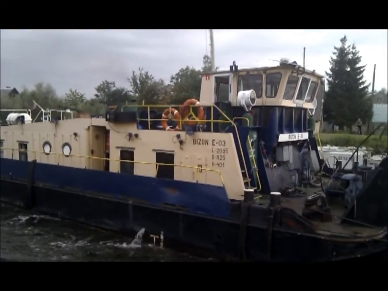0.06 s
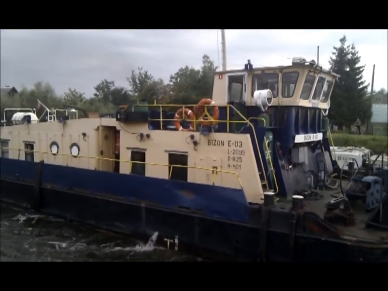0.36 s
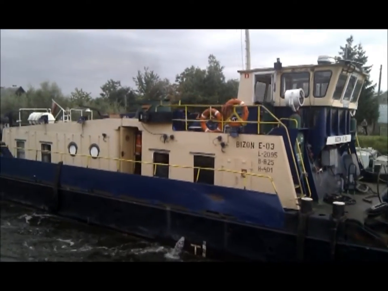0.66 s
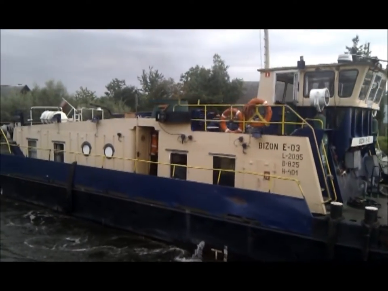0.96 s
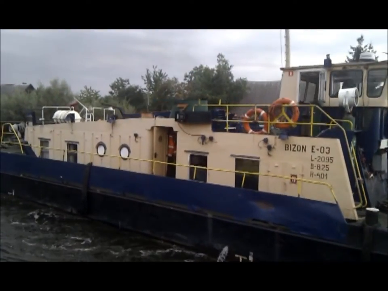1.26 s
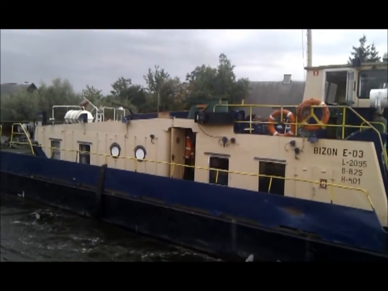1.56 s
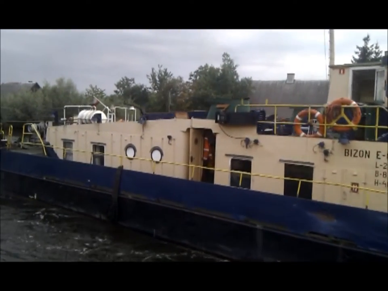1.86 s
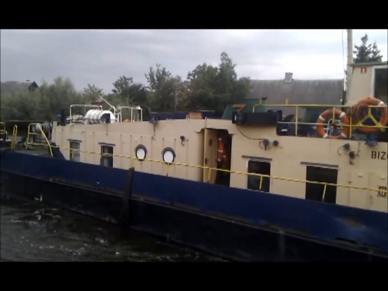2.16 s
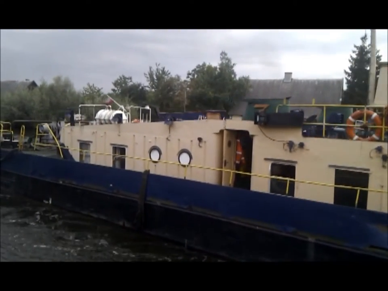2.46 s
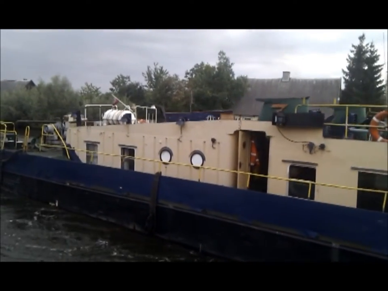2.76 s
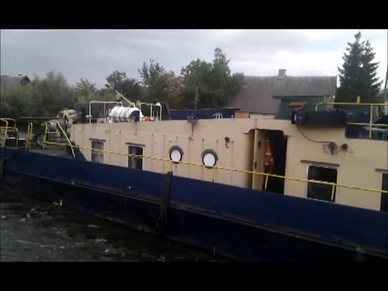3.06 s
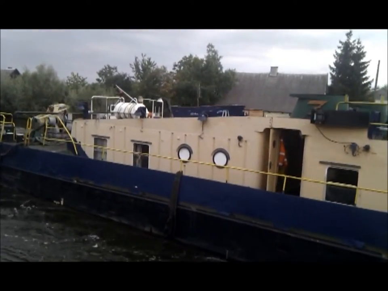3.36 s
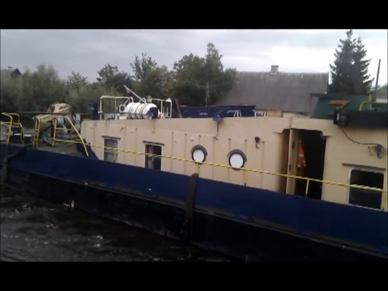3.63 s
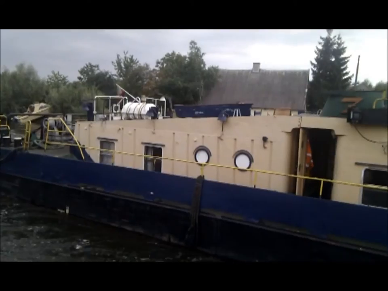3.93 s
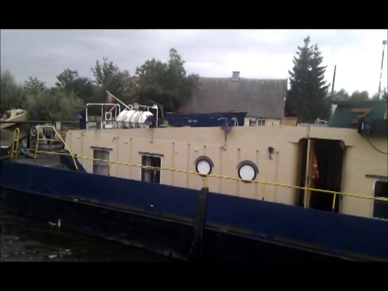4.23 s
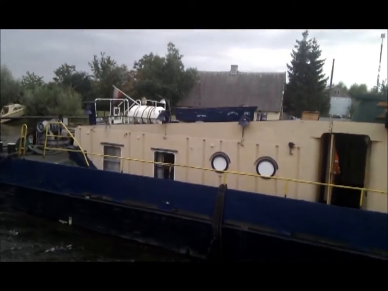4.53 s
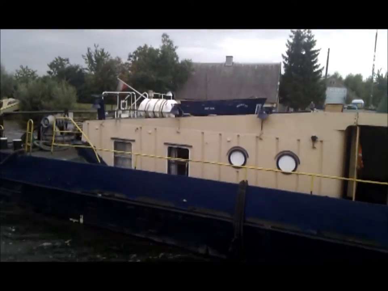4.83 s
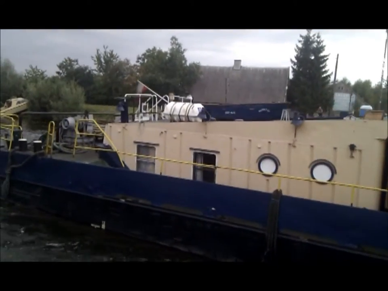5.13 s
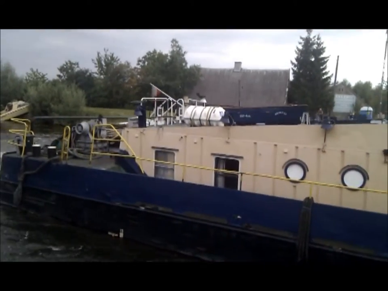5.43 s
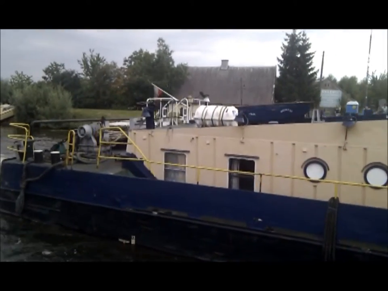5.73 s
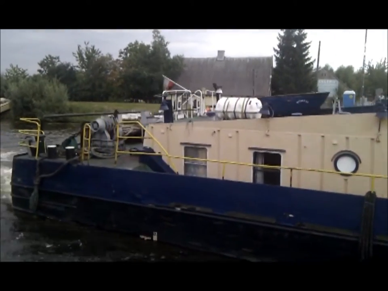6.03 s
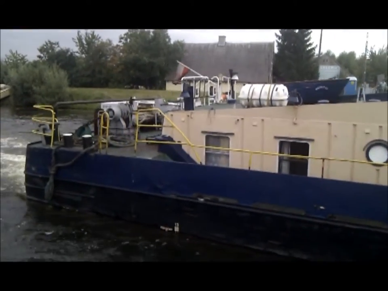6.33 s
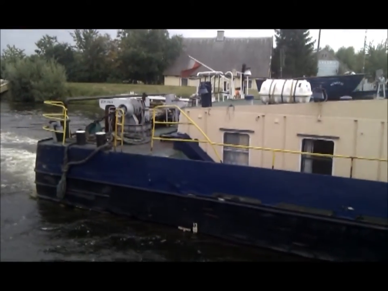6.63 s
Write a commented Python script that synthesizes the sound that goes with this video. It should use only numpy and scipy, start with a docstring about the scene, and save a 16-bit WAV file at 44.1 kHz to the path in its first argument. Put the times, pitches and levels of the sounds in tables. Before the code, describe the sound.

Close diesel engines throb steadily as a tugboat slides past, its machinery rattling and whining over the fizz of churned water.

```python
"""On a river, one small microphone, close to a pusher tug sliding past from wheelhouse to stern.
From the start two six-cylinder diesels beat, a little apart in speed; the deckhouse drones, the engine
room clatters through its open door, gears whine, a generator hums and foam hisses. Short ticks of hiss
come from 0.5 s, dull accents in the clatter from 1.1 s, hard firings thump from 2.4 s. Near 4.4 s the
exhaust comes abeam and the fuller propeller wash takes over; the drone swells last, at 6.5 s."""
import sys
import numpy as np
from scipy import signal
from scipy.fft import rfft, irfft, next_fast_len
from scipy.io import wavfile

SR = 44100
rng = np.random.default_rng(int(sys.argv[2]) if len(sys.argv) > 2 else 0)


def generate_wav(signal):
    """Clip the signal to [-1, 1] and save it as 16-bit WAV at the path in sys.argv[1]."""
    frames = np.transpose(np.atleast_2d(signal))
    scaled = np.clip(frames, -1, 1) * 32767
    pcm = np.round(scaled).astype(np.int16)
    wavfile.write(sys.argv[1], SR, pcm)


N = 295029
T = np.arange(N) / SR
NEAR_CYCLE_HZ, FAR_CYCLE_HZ = 9.209, 9.498  # four-stroke cycle rates of the two engines
# fizzy water along the bow: (frequency [Hz], relative level [dB])
BOW_WATER = [(600, -16.5), (2350, -14.5), (2800, 1), (3050, -4), (3650, 2.5), (4100, 2.5), (4400, -0.5),
             (4900, 0), (5650, -3), (5900, -10), (6400, -10.5), (7100, -35.5)]


def from_db(db):
    """Decibels to gain."""
    return 10 ** (np.asarray(db) / 20)


def rms_one(x):
    """Scale to unit power."""
    return x / np.sqrt(np.mean(x ** 2) + 1e-20)


def drift(rate):
    """A smooth random wander of unit power that turns about rate times a second."""
    step, settle = 40, 2000
    pole = np.exp(-2 * np.pi * rate * step / SR)
    noise = rng.standard_normal(N // step + settle + 2)
    slow = signal.lfilter([1], [1, -2 * pole, pole * pole], noise)[settle:]
    return np.interp(np.arange(N) / step, np.arange(len(slow)), rms_one(slow))


def coloured(x, spectrum):
    """Shape a sound by rows of (frequency [Hz], relative level [dB]); unit power."""
    size = next_fast_len(N)
    hz, db = np.transpose(spectrum)
    bins = np.maximum(np.fft.rfftfreq(size, 1 / SR), 1)
    gain = from_db(np.interp(np.log(bins), np.log(hz), db, left=-90, right=-90))
    return rms_one(irfft(rfft(x, size) * gain, size)[:N])


def resonance(hz, width_hz):
    """Noise ringing in one band with steep skirts; unit power."""
    b, a = signal.iirpeak(hz, hz / (1.23 * width_hz), fs=SR)
    return rms_one(signal.lfilter(b, a, signal.lfilter(b, a, rng.standard_normal(N))))


def swell(at_s, half_s, lift_db, base_db=0):
    """A bell-shaped rise and fall in dB, as when a source slides past the microphone."""
    return base_db + lift_db * np.exp(-((T - at_s) / half_s) ** 2)


def bursts(events, attack_s, decay_s):
    """Envelope of (time [s], level [dB]) events that rise quickly and die away."""
    envelope = np.zeros(N)
    for at_s, db in events:
        age = np.maximum(T - at_s, 0)
        envelope += from_db(db) * (1 - np.exp(-age / attack_s)) * np.exp(-np.minimum(age / decay_s, 20))
    return envelope


def crank(cycle_hz, strongest_s):
    """Engine cycles counted from a firing of the strongest cylinder; the pitch sinks with the pass."""
    doppler = 1 - .001 * (T - 3.7)  # the engines are abeam at 3.7 s
    governor_hunt = 1 + .0001 * drift(.98)
    cycles = np.cumsum(cycle_hz * doppler * governor_hunt) / SR
    return cycles - np.interp(strongest_s, T, cycles)


def firings(cycles, decay, uneven_db, chug_db):
    """A dying pulse for each firing; the six cylinders differ, and the strongest chugs once a cycle."""
    cylinder_db = uneven_db * rms_one(rng.standard_normal(6))
    cylinder_db += chug_db * np.cos(2 * np.pi * np.arange(6) / 6)
    stroke = cycles * 6 + decay / 2
    cylinder = np.floor(stroke).astype(int) % 6
    return rms_one(from_db(cylinder_db)[cylinder] * np.exp(-(stroke % 1) / decay))


def pulsed_noise(engines, depth, decay, uneven_db, chug_db, repeat, slip_s=.00013):
    """Noise pulsing with both engines' firings; valves and gears repeat a share of it every cycle."""
    near, far = (firings(cycles, decay, uneven_db, chug_db) for cycles in engines)
    power = (2 * near ** 2 + far ** 2) / 3
    angle = np.linspace(0, 1, round(SR / FAR_CYCLE_HZ / 2))
    rattle = np.zeros(N)
    for cycles in engines:
        position = (cycles + slip_s * NEAR_CYCLE_HZ * drift(2.8)) % 1
        rattle += np.interp(position, angle, rng.standard_normal(len(angle)))
    fresh = np.interp(np.arange(N) / 2, np.arange(N), rng.standard_normal(N))
    noise = np.sqrt(1 - repeat) * rms_one(fresh) + np.sqrt(repeat) * rms_one(rattle)
    return noise * np.sqrt(1 - depth + depth * power)


def exhaust_notes(engines, nearness):
    """The two exhausts beat at each order; reflections off hull and water lift single notes."""
    # exhaust tones: (order [x cycle rate], near engine base level [dB], far engine base level [dB])
    tones = [(3, -54, -70), (6, -37.6, -46), (8, -56, -60), (9, -42, -42.3), (10, -52, -58),
             (11, -48.7, -49), (12, -39.3, -41.7), (13, -55, -58.5), (14, -48, -65), (15, -48, -54.5),
             (16, -61, -56), (17, -53, -57.5), (18, -49, -52.5), (20, -55, -43.6), (21, -43.1, -66),
             (22, -50, -68), (23, -53, -68), (26, -56, -62), (27, -48.3, -59)]
    # reflections sweeping over the microphone: (time [s], half length [s], lift [dB])
    lobes = [(2.6, 1.1, 1.5), (6.4, .85, 5), (5.03, 2.0, 13), (0.46, .5, 1), (3.2, 1.2, 2.5),
             (0.72, .95, 7), (1.65, 0.48, 7), (6.25, .55, 4.5), (6.3, .6, 6.5), (2.6, 0.35, 6),
             (4.27, .25, 9.5), (5.6, 1.5, 7)]
    # what each reflection lifts: (one or more orders [x cycle rate])
    lobe_orders = [(6,), (6,), (9,), (12,), (12,), (20, 21), (20, 21), (20, 21), (18,), (27,), (27,), (27,)]
    firing_lead = .16 * (FAR_CYCLE_HZ - NEAR_CYCLE_HZ)  # order 6 beats 0.16 s ahead of its overtones
    notes = np.zeros(N)
    for order, *levels in tones:
        gain, start = nearness ** .4, .9 * rng.standard_normal()  # the pipe smears the phases
        lifts = [swell(*lobe) for orders, lobe in zip(lobe_orders, lobes) if order in orders]
        if lifts:  # these strong orders crest together
            gain, start = rms_one(from_db(sum(lifts))), 0
        leads = (0, firing_lead if order == 6 else 0)
        for cycles, lead, db in zip(engines, leads, levels):
            phase = 2 * np.pi * order * (cycles + lead) + start + .17 * drift(8.2)
            notes += gain * from_db(db + drift(6.8)) * np.sqrt(2) * np.cos(phase)
    return notes


def exhaust_rumble(engines, nearness):
    """Each firing leaves the pipe as a rough, low puff."""
    # exhaust puffs: (frequency [Hz], relative level [dB])
    spectrum = [(12, -27), (30, -15.5), (48, -4), (70, 0), (100, -0.5), (140, -3.5), (185, -1.5),
                (230, -21), (330, -25.5), (600, -57.5)]
    puffs = pulsed_noise(engines, depth=.55, decay=.45, uneven_db=-.5, chug_db=2.5,
                         repeat=.025, slip_s=.00015)
    gain = from_db(swell(at_s=4.4, half_s=1.5, lift_db=7, base_db=-41)) * nearness ** .5
    return gain * coloured(puffs, spectrum)


def deckhouse_drone(engines, nearness):
    """The steel deckhouse drones as the engines shake it."""
    # deckhouse steel: (frequency [Hz], relative level [dB])
    spectrum = [(130, -17.5), (205, -0.5), (248, 0), (275, -1), (305, 0), (345, -5), (430, -13), (600, -29)]
    shaking = pulsed_noise(engines, depth=.21, decay=.49, uneven_db=6, chug_db=2, repeat=.2)
    gain = from_db(swell(at_s=6.5, half_s=.64, lift_db=5.5, base_db=-39.5)) * nearness
    return gain * coloured(shaking, spectrum)


def cabin_ring():
    """The cabin rings out through the open door, the low note widely, the higher in narrow beams."""
    # cabin resonances: (frequency [Hz], width [Hz])
    modes = [(249, 8.5), (549.3, 9.8), (442, 280)]
    # their beams at the microphone: (time abeam [s], half length [s], lift [dB], level from afar [dB])
    beams = [(4.84, 2.9, 7.5, -52.5), (4.4, 0.59, 9, -53.3), (4.05, 0.62, 9, -52.5)]
    return sum(from_db(swell(*beam)) * resonance(*mode) for beam, mode in zip(beams, modes))


def valve_clatter(engines):
    """Valves clatter with the firings, heard through the engine room door."""
    # engine room from outside: (frequency [Hz], relative level [dB])
    spectrum = [(300, -17), (440, -8), (550, -0.2), (660, -1.5), (740, -4), (850, -2.5), (1130, -5.5),
                (1310, -5), (1450, -8), (1780, -5), (2000, -10.5), (2200, -8), (2500, -12.5), (4500, -28.5)]
    # clatter at the microphone: (time [s], relative level [dB])
    levels = [(0, -38.5), (.55, -38), (1.1, -37.5), (1.6, -38.5), (2.5, -37.5), (3.0, -37.5), (4.55, -36.5),
              (4.75, -37), (5.5, -35.5), (5.8, -36.5), (6.65, -36)]
    valves = pulsed_noise(engines, depth=.13, decay=.4, uneven_db=2, chug_db=-.5, repeat=.38)
    return from_db(3.5 + np.interp(T, *np.transpose(levels))) * coloured(valves, spectrum)


def whine(hz, shaft, wander, flutter_db):
    """Gear teeth mesh with backlash: the tone follows the shaft speed, flutters, comes and goes."""
    turns = np.cumsum(hz * (1 + wander * (shaft + drift(25)))) / SR
    flutter = np.tanh(drift(20)) + np.tanh(drift(1.6))
    return rms_one(from_db(flutter_db * flutter) * np.sin(2 * np.pi * turns))


def gears():
    """The gearbox whines, its case roars around the note, and lesser gears and pumps join in."""
    # the gearbox sings out or sinks away: (time [s], half length [s], lift [dB])
    swings = [(0.118, 0.15, 1.5), (0.95, 0.092, 6), (1.418, 0.18, -11.5), (2.72, .15, -7),
              (2.975, 0.093, 7), (3.6, 0.33, 6), (4.302, 0.18, 5), (4.726, 0.075, 9), (4.975, 0.17, 8.5),
              (5.882, 0.047, 8.5), (6.115, 0.065, 11), (6.5, 0.2, 6.5)]
    # gear and pump whines, each beamed its own way:
    # (frequency [Hz], time loudest [s], half length [s], lift [dB], level from afar [dB])
    lesser_whines = [(402.6, 4.05, .3, 4.5, -54), (640, .6, .4, 8, -61.5), (886, 6.3, .7, 9.5, -56),
                     (1084, 4.6, 1.1, 9, -60.5), (1181, 3.7, 2, 1.5, -58), (1306, 3.3, 3.5, 5.5, -56)]
    pass_db = swell(at_s=3.5, half_s=5, lift_db=3, base_db=-50)
    swing_db = sum(swell(*swing) for swing in swings)
    shaft = drift(2.83)
    mesh = from_db(pass_db + swing_db) * whine(809.5, shaft, wander=.0026, flutter_db=1.5)
    case = from_db(pass_db + .75 * swing_db - 1.5) * resonance(hz=792, width_hz=220)
    lesser = sum(from_db(swell(*beam)) * whine(hz, shaft, wander=.002796, flutter_db=4)
                 for hz, *beam in lesser_whines)
    return mesh + case + lesser


def generator(nearness, hz=150.1):
    """The generator hums on one note, wavering in level."""
    gain = nearness ** 2 * from_db(-47.5 + 2.7 * drift(3.5))
    return gain * np.sqrt(2) * np.sin(2 * np.pi * hz * T)


def wash(drops_per_s=1800, drop_share=.25):
    """Bursting foam hisses and droplets fall back in clumps; bow water gives way to propeller wash."""
    # fuller, churned water at the stern: (frequency [Hz], relative level [dB])
    stern_water = [(600, -15), (2200, -12), (2700, -8), (3100, -4), (3680, 1), (4250, 0.5), (4450, -1),
                   (5100, -3), (5500, -11.5), (5900, -11), (6450, -19), (7100, -54)]
    falls = rng.random(N) < drops_per_s * from_db(1.5 * drift(10)) / SR
    sizes = from_db(3 * np.minimum(rng.exponential(1, N), 4.5))
    drops = falls * sizes * rng.choice([-1, 1], N)
    pitches_hz = np.geomspace(2600, 6000, num=12)
    pitch_index = rng.integers(0, len(pitches_hz), N)
    rings = sum(signal.lfilter(*signal.iirpeak(hz, 7, fs=SR), drops * (pitch_index == k) + 1e-18)
                for k, hz in enumerate(pitches_hz))
    foam = rng.standard_normal(N)
    stern = .5 + .5 * np.tanh(T - 4.3)  # the stern arrives at 4.3 s
    water = np.zeros(N)
    for blend, spectrum in ((1 - stern, BOW_WATER), (stern, stern_water)):
        water += blend * np.sqrt(1 - drop_share) * coloured(foam, spectrum)
        water += blend * np.sqrt(drop_share) * coloured(rings, spectrum)
    surge_db = .91 * drift(14)
    return water * from_db(swell(at_s=5.5, half_s=1.7, lift_db=2.5, base_db=-37.5) + surge_db)


def hiss_ticks():
    """Short bursts of high hiss: a faint tick at 1.0 s, the others wavelets breaking on the hull."""
    # bursts of hiss: (time [s], level [dB])
    ticks = [(.516, -31), (1.003, -35), (2.427, -34), (2.665, -29.5), (3.778, -34)]
    return bursts(ticks, attack_s=.00073, decay_s=.014) * coloured(rng.standard_normal(N), BOW_WATER)


def clatter_accents():
    """Brief, dull mid-pitched accents stand out of the engine clatter."""
    # accents: (time [s], level [dB])
    accents = [(1.129, -32), (1.315, -34), (1.516, -28), (1.745, -32), (4.70, -30.5), (5.803, -29.5),
               (6.094, -30)]
    # tone of an accent: (frequency [Hz], relative level [dB])
    spectrum = [(350, -18), (680, -1), (1100, -7), (1700, -12), (3000, -36)]
    return bursts(accents, attack_s=.0016, decay_s=.018) * coloured(rng.standard_normal(N), spectrum)


def exhaust_thumps(band_hz=(85, 230)):
    """A cylinder fires hard: one push and pull of air from the exhaust pipe."""
    # hard firings: (time [s], peak level [dB])
    hard_firings = [(2.357, -23), (3.353, -21.5), (3.785, -29), (4.875, -23), (4.981, -28)]
    pipe = signal.butter(2, band_hz, "band", fs=SR, output="sos")
    puff = signal.sosfilt(pipe, signal.unit_impulse(SR // 10))
    clicks = np.zeros(N)
    for at_s, db in hard_firings:
        clicks[int(at_s * SR)] += from_db(db)
    return signal.fftconvolve(clicks, puff / puff.max())[:N]


def scene():
    """Engines, machinery and water at one close microphone, the same in both channels."""
    engines = [crank(NEAR_CYCLE_HZ, strongest_s=3.79), crank(FAR_CYCLE_HZ, strongest_s=3.8255)]
    nearness = rms_one(from_db(swell(at_s=5, half_s=1, lift_db=2)))  # the engine room comes abeam
    exhaust = exhaust_notes(engines, nearness) + exhaust_rumble(engines, nearness)
    deckhouse = deckhouse_drone(engines, nearness) + cabin_ring()
    machinery = valve_clatter(engines) + gears() + generator(nearness)
    water = wash()
    brief_sounds = hiss_ticks() + clatter_accents() + exhaust_thumps()
    return np.tile(exhaust + deckhouse + machinery + water + brief_sounds, (2, 1))


def record(dry):
    """A narrow-band recorder cuts the top steeply above 7150 Hz."""
    return signal.sosfilt(signal.ellip(10, .1, 80, 7150, fs=SR, output="sos"), dry)


dry = scene()
out = record(dry)
generate_wav(out)
```